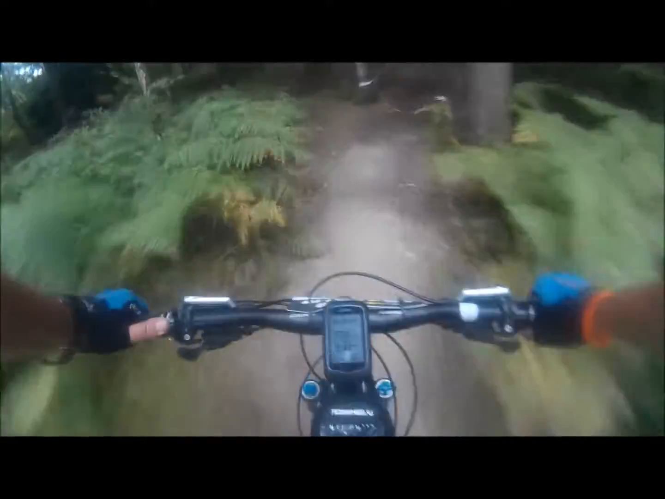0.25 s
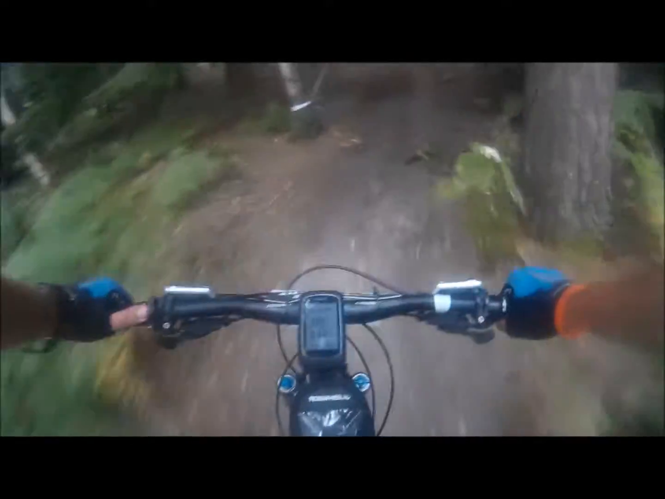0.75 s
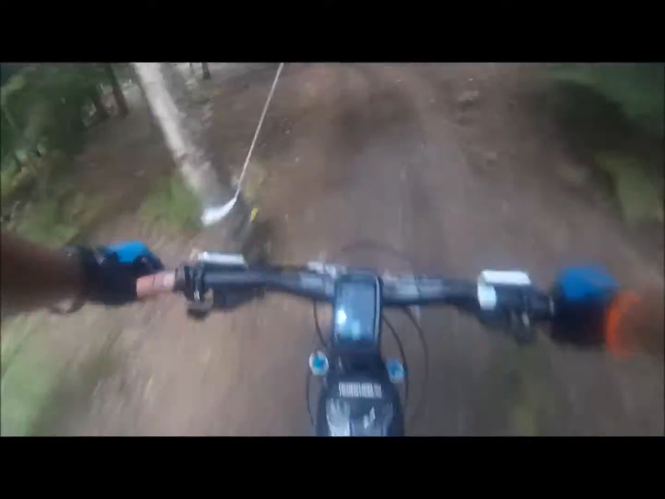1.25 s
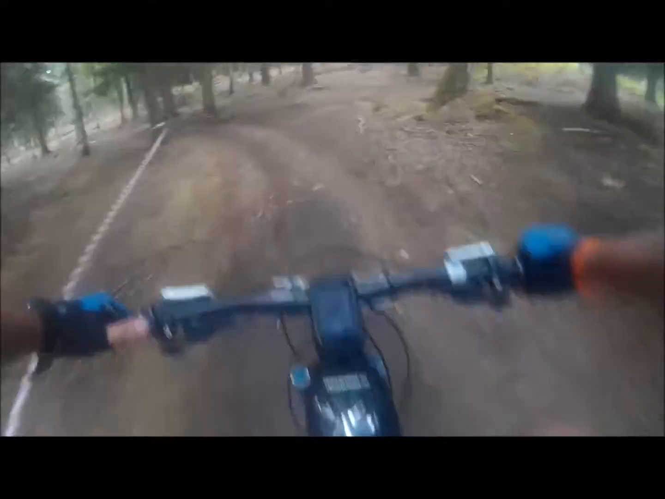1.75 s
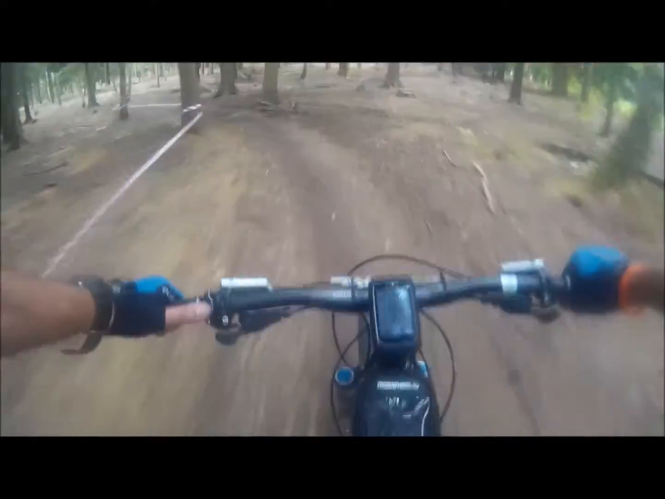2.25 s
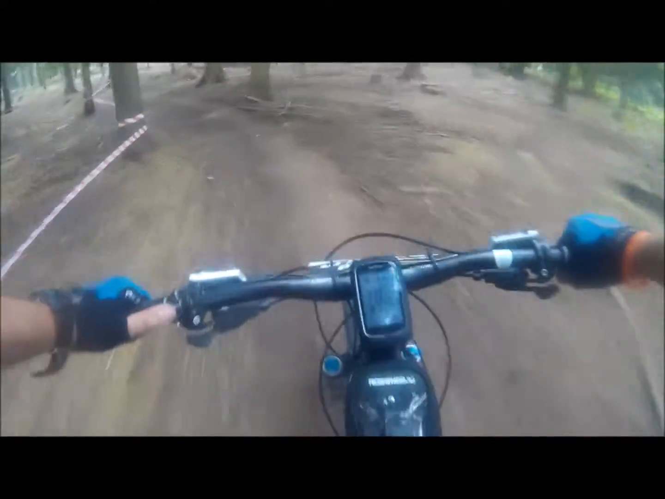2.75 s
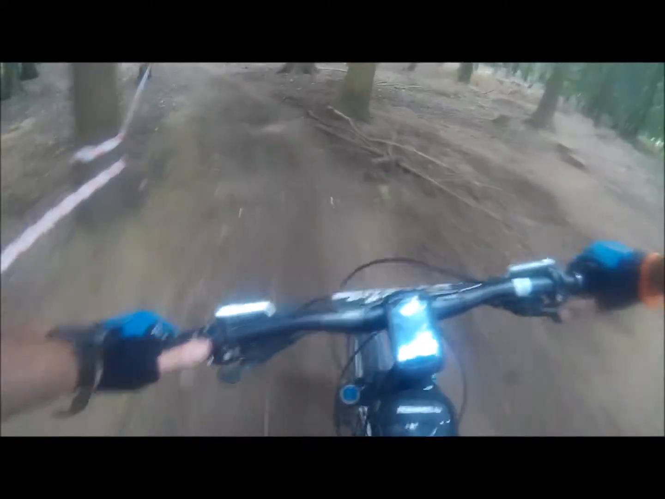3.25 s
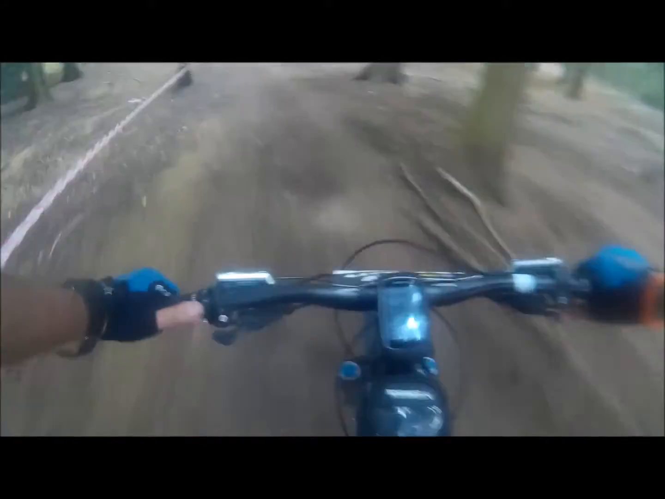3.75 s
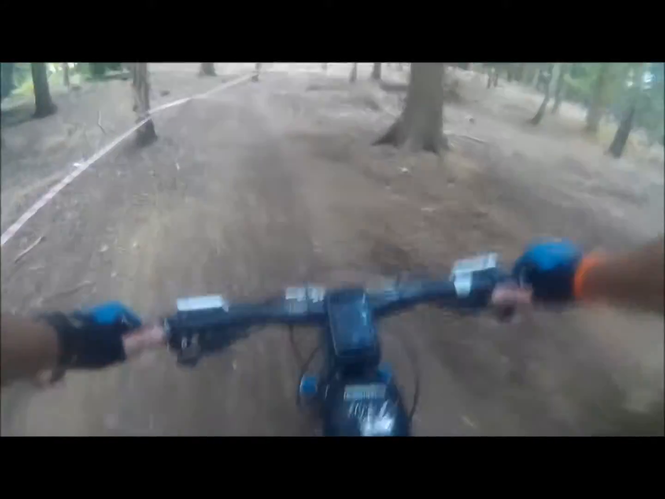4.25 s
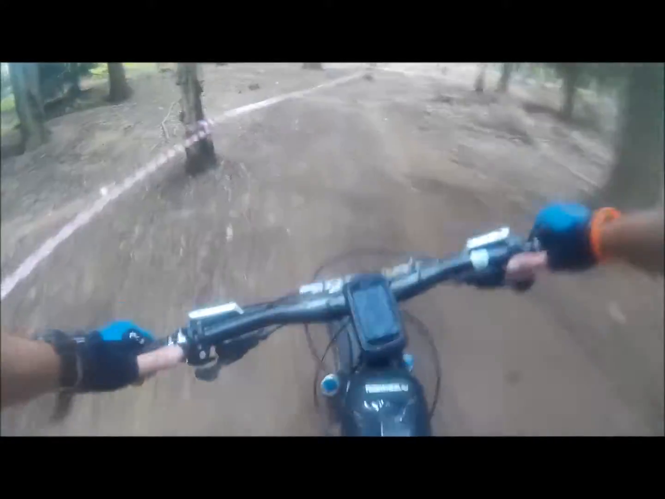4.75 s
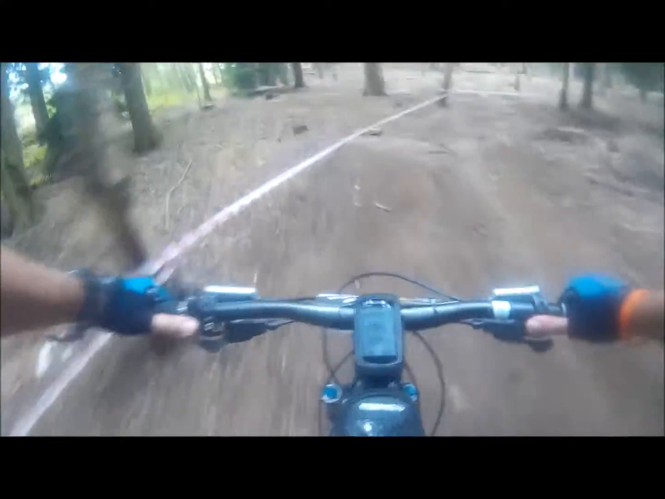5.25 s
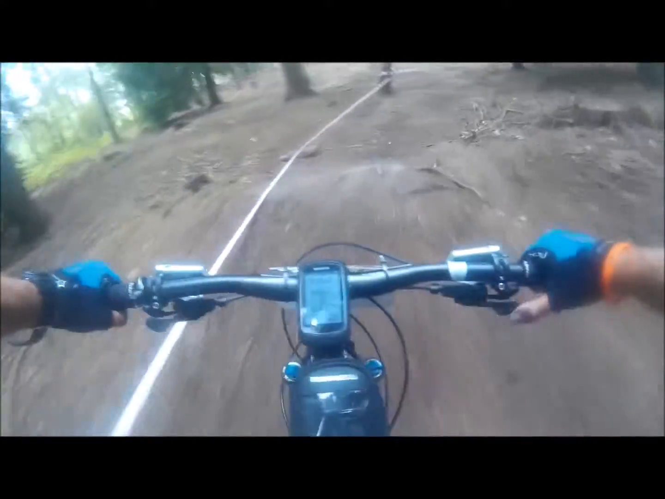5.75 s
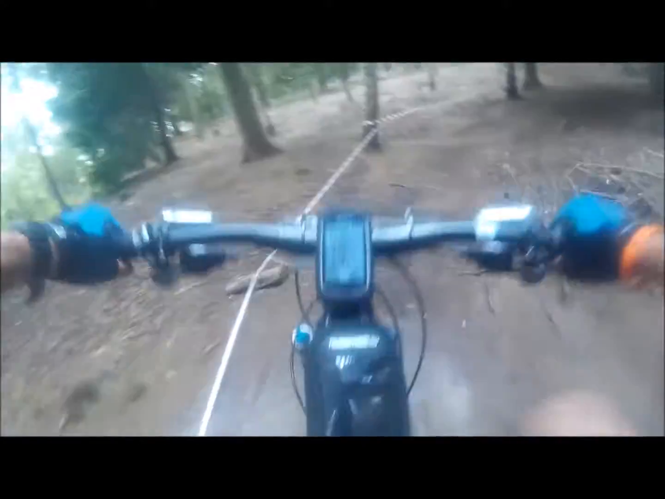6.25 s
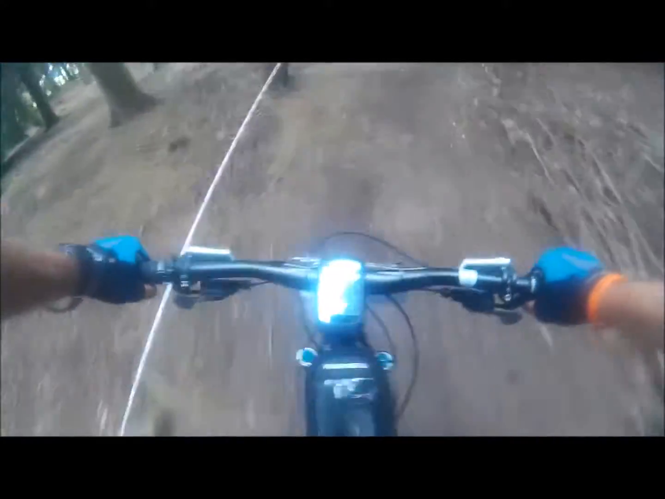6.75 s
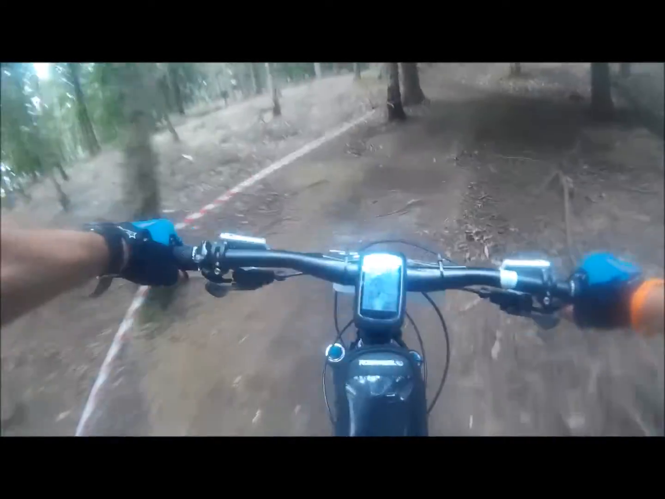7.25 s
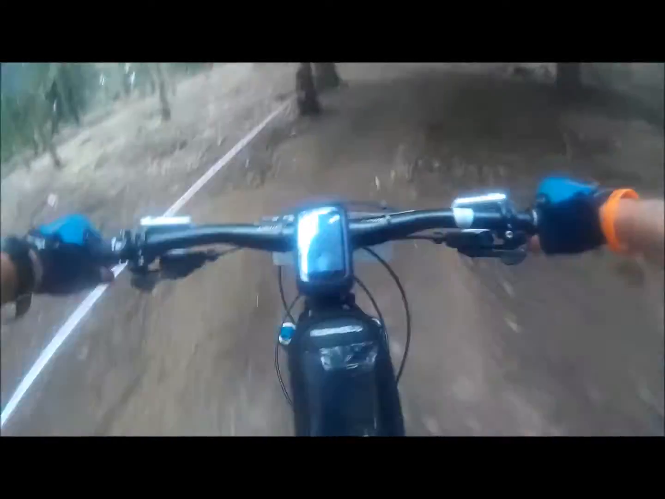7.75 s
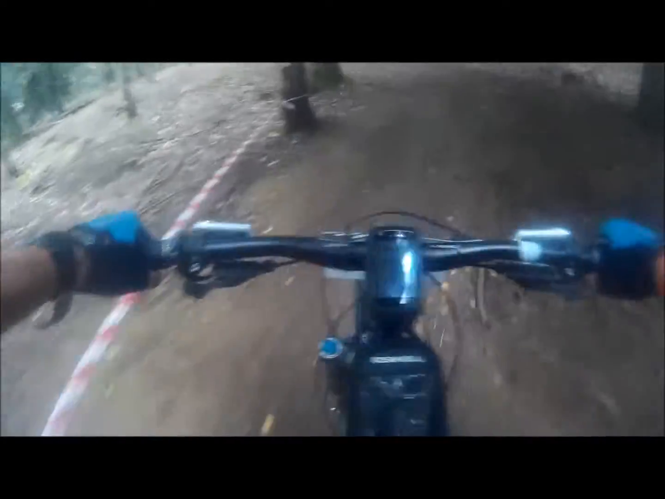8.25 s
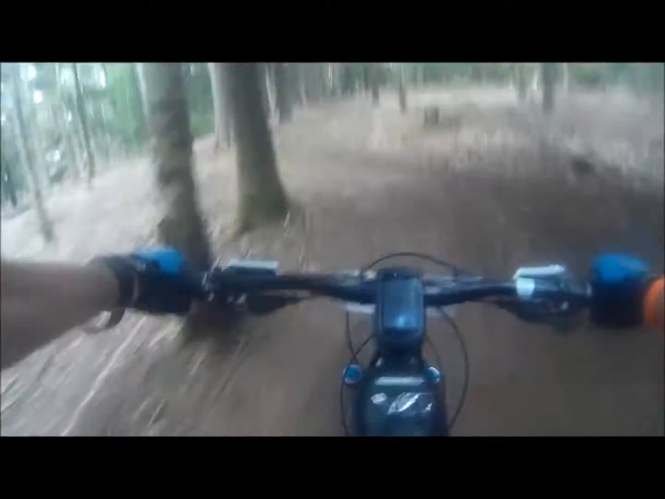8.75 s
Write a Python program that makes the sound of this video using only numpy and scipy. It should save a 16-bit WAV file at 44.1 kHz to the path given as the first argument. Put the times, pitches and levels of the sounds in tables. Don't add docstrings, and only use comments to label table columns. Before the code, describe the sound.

A mountain bike runs down a rooty dirt trail, heard from inside a rattling plastic case with gusty wind, deep rumble, knocks and grit ticks.

```python
import sys
import numpy as np
from scipy import signal
from scipy.fft import rfft, irfft
from scipy.io import wavfile
from scipy.ndimage import uniform_filter1d, minimum_filter1d

SR = 44100
rng = np.random.default_rng(int(sys.argv[2]) if len(sys.argv) > 2 else 0)


def digitize_waveform(pressure):
    field = np.atleast_2d(pressure).T
    bounded = np.clip(field, -1, 1)
    quanta = np.round(bounded * 32767).astype(np.int16)
    wavfile.write(sys.argv[1], SR, quanta)


def volts_from_decibels(level):
    exponent = np.asarray(level, float) / 20
    return 10 ** exponent


N = 396900

# pitch in Hz, width in Hz, level in dB.
CASE_MODES = [(1187, 74, -2), (1500, 91, 5), (1792, 496, 0.5), (2043, 363, -1)]
# pitch in Hz, width in Hz, level in dB.
SHELL_GROUPS = [
    [(2432, 130, 2.5), (2923, 100, 6.5)],
    [(3630, 800, -10), (3887, 310, 0.5), (4150, 710, -10)],
    [(4790, 120, -13), (6050, 280, -10), (6930, 145, -6.5), (7800, 1800, -11.5)],
    [(9950, 170, -6.5), (10460, 480, -9), (11700, 880, -13), (12300, 550, -13), (13600, 1100, -23)],
]
# pitch in Hz, width in Hz, level in dB.
STRAP_MODES = [(149, 91, -10), (285, 49, -19), (412.5, 26.5, 3.5)]


def rms_one(x):
    return x / np.sqrt(np.mean(x ** 2) + 1e-20)


def drift(rate):
    r = np.exp(-80 * np.pi * rate / SR)
    slow = signal.lfilter([1], [1, -2 * r, r * r], rng.standard_normal(N // 40 + 2002))[2000:]
    return np.interp(np.arange(N) / 40, np.arange(len(slow)), rms_one(slow))


def played(rows):
    s, *columns = np.transpose(rows)
    return [np.interp(np.arange(N) / SR, s, column) for column in columns]


def arches(s, length_s, height):
    t = np.arange(0, N, 64)[:, None] / SR
    swells = np.sum(height * np.exp(-(2 * (t - s) / length_s) ** 2), axis=1)
    return np.interp(np.arange(N) / SR, t[:, 0], swells)


def resonance(x, hz, width_hz):
    r = np.exp(-np.pi * width_hz / SR)
    feedback = [1, -2 * r * np.cos(2 * np.pi * hz / SR), r * r]
    return signal.lfilter((1 - r * r) / 2 * np.array([1, 0, -1]), feedback, x + 1e-18)


def body(x, modes):
    out = 0
    for k, (hz, width_hz, db) in enumerate(modes):
        out = out + (-1) ** k * volts_from_decibels(db) * resonance(x, hz, width_hz)
    return out


def coloured(spectrum, count, patchy_db, rate):
    hz, db = np.transpose(spectrum)
    bins = np.arange(N // 2 + 1) * SR / N + 1e-3
    colour = volts_from_decibels(np.interp(np.log(bins), np.log(hz), db, left=-120, right=-120))
    spectrum_now = rfft(rng.standard_normal(N)) * colour
    centres = np.linspace(np.log(hz[0]), np.log(hz[-1]), count)
    together, out = drift(rate), 0
    for k in range(count):
        share = np.interp(np.log(bins), centres, np.arange(count) == k)
        band = irfft(spectrum_now * share, N)
        out = out + band * volts_from_decibels(patchy_db * (0.51 * together + drift(rate)))
    return rms_one(out)


def evened(x, over_s=0.092):
    return rms_one(x / np.sqrt(uniform_filter1d(x ** 2, int(over_s * SR)) + 0.039))


def bursts(times, db, fall_s, strike):
    out, t = np.zeros(N), np.arange(int(0.05 * SR)) / SR
    sprays = rng.standard_normal((len(times), len(t))) * np.exp(-t / np.reshape(fall_s, (-1, 1)))
    sprays /= np.sqrt(np.sum(sprays ** 2, axis=1, keepdims=True))
    sprays[:, 0] += strike
    for s, gain, spray in zip(times, volts_from_decibels(db), sprays):
        at = round(s * SR)
        out[at:at + len(t)] += gain * spray[:N - at]
    return out


def lurching():
    # centre in seconds, level in dB, length in seconds.
    lurches = [(-0.009, -5.5, 0.048), (0.728, -14.5, 0.065), (1.095, -14.5, 0.094), (1.259, -12.5, 0.14),
               (1.467, -16, 0.11), (1.606, -6, 0.08), (1.746, -10.5, 0.33), (2.39, -16, 0.18),
               (2.54, -20, 0.28), (3.255, -12, 0.19), (3.599, -11, 0.072), (3.91, -19.5, 0.55),
               (4.11, -19, 0.19), (4.312, -12.5, 0.14), (4.502, -20, 0.42), (4.661, -7.5, 0.04),
               (4.93, -16, 0.24), (5.096, -12.5, 0.099), (5.238, -15.5, 0.045), (5.508, -18, 0.13),
               (6.243, -15, 0.14), (6.565, -16, .22), (6.92, -12.5, 0.18), (7.125, -10, 0.23),
               (7.233, -2.5, 0.043), (7.384, -12, 0.12), (7.793, -18.5, 0.3), (8.192, -18.5, 0.091),
               (8.412, -13, 0.18), (8.81, -17.5, 0.26)]
    s, db, length_s = np.transpose(lurches)
    return np.sqrt(arches(s, length_s / np.sqrt(2), volts_from_decibels(2 * db)))


def jostle(lurch, rough):
    # pitch in Hz, level in dB per Hz.
    rumble_colour = [(5, -2), (10, 11), (20, -2), (30, -13), (45, -35), (70, -25)]
    swing = np.hypot(lurch, volts_from_decibels(-26.5 + 0.53 * rough))
    return swing * evened(coloured(rumble_colour, count=2, patchy_db=-1.0, rate=17.0))


def rattle(level_db, shell_level_db, per_s, spread_db, shell_db):
    sizes = volts_from_decibels(spread_db * np.minimum(rng.exponential(1, N), 4)) * rng.choice([-1, 1], N)
    born = rng.random(N) < per_s * volts_from_decibels(5.0 * drift(18)) / SR
    shake = rms_one(sizes * born) + 1.57 * rng.standard_normal(N)
    shake *= volts_from_decibels(1.7 * drift(35))
    high = sum(volts_from_decibels(db) * body(shake, group) for db, group in zip(shell_db, SHELL_GROUPS))
    low = volts_from_decibels(level_db) * rms_one(body(shake, CASE_MODES))
    return low + volts_from_decibels(shell_level_db + 0.66 * drift(4.9)) * rms_one(high)


def knocks():
    # start in seconds, peak in dB.
    knock_table = [(0.2512, -25.5), (0.345, -31), (0.671, -27), (1.239, -17.5), (1.277, -17.5),
                   (1.302, -24), (1.7845, -12.5), (1.889, -26), (1.996, -30), (3.222, -23.5),
                   (3.905, -14.5), (4.024, -16.5), (4.272, -43), (4.459, -18), (4.6168, -40), (4.663, -25),
                   (4.763, -18), (5.239, -30.5), (5.348, -28), (5.8048, -27), (6.085, -26), (6.346, -26),
                   (7.148, -23.5), (7.217, -27), (7.866, -26), (8.04, -32), (8.634, -29), (8.116, -26),
                   (8.527, -22), (8.7297, -24)]
    # start in seconds, peak in dB, fall time in seconds.
    scuff_table = [(0.752, -37, 0.02), (0.789, -27.5, 0.03), (1.401, -35, .005), (1.506, -37, 0.0089),
                   (1.542, -26, 0.022), (4.183, -24, 0.0037), (4.245, -17, 0.0032), (4.336, -23, 0.0055),
                   (4.8303, -31, 0.0038), (5.199, -45, 0.004), (6.371, -23.5, 0.0055), (6.411, -34, 0.005),
                   (6.449, -31, 0.0062), (7.541, -30, 0.016), (7.946, -25, 0.0083), (1.856, -26, 0.012),
                   (4.229, -23, 0.004), (4.2903, -16, 0.004), (4.3057, -15.5, 0.011), (4.475, -19, 0.016),
                   (4.861, -18.5, 0.0091), (6.196, -21.5, 0.01), (7.092, -17, 0.0047),
                   (7.6536, -30, 0.0051), (8.264, -26, 0.014), (8.2865, -24, 0.0064), (8.314, -35, .007),
                   (8.4743, -23.5, 0.0089), (8.785, -16, 0.0096), (1.335, -26, .008), (1.769, -24, .006),
                   (4.623, -19, 0.0031), (4.6113, -31, 0.0034), (4.791, -24, .006), (4.9337, -27, 0.0054),
                   (6.178, -27, 0.0066), (6.308, -30, .008), (6.358, -28, .005), (6.431, -31, .007),
                   (6.464, -32, 0.0042), (6.534, -43, 0.0074), (7.79, -29, .006), (8.679, -32, 0.0054),
                   (8.715, -28, 0.0057), (7.71, -33, .008), (7.996, -35, .006)]
    s, db = np.transpose(knock_table)
    blows = bursts(s, db + 30.0, fall_s=0.0047, strike=0.32)
    s, db, fall_s = np.transpose(scuff_table)
    scuffs = bursts(s, db + 29.5 + 8.4 * np.log10(fall_s / 0.016), fall_s, strike=0.17)
    low = body(volts_from_decibels(-2.5) * blows + volts_from_decibels(-3.5) * scuffs, CASE_MODES)
    main = resonance(volts_from_decibels(-4.5) * blows + volts_from_decibels(7.5) * scuffs, 1540, 93)
    shell = body(blows + volts_from_decibels(-2.0) * scuffs, SHELL_GROUPS[0] + SHELL_GROUPS[1])
    return low - main + volts_from_decibels(-22.0) * shell


def ticks():
    # start in seconds, peak in dB, hardness in dB, fineness in dB.
    grains = [(0.3463, -31, -1, 1), (0.671, -26, -1.5, 2), (1.0077, -42, -9, -2), (1.2407, -40, 0, -17),
              (1.277, -20.5, -5.5, 9), (1.4726, -40, -25, -8), (1.7859, -16.5, -3.5, 5),
              (2.107, -27, -3.5, 8), (3.618, -27.5, 1.5, 23), (3.741, -19.5, -6.5, 15.5),
              (3.8528, -30, -18, -4), (4.0237, -21, 0.5, 3), (4.4577, -23.5, 0.5, -2),
              (4.658, -33.5, -12, -2), (4.87, -25, 0.5, -2), (5.612, -21, 0, 4), (6.0558, -30.5, -1, 1),
              (6.199, -27.5, -0.5, -0.5), (6.756, -34, 2.5, -7), (7.141, -33, -17, 2),
              (7.543, -26.5, -3, 4.5), (8.1175, -32, -3.5, -1), (8.787, -37, -36, -13),
              (1.401, -37, -12, -5), (4.176, -44, -12, -15), (4.3794, -42, -17, -8), (4.7476, -36, -12, 4),
              (5.795, -40, -3, 2), (7.09, -31, -14, -2), (7.211, -39, -6, 0), (8.408, -47, 2, 2),
              (7.9668, -40, -15, 2.5), (8.8278, -41, -12, -13), (8.9106, -39, -10, -6)]
    # pitch in Hz, width in Hz.
    deaf_gaps = [(5300, 250), (8700, 690)]
    s, db, hard_db, fine_db = np.transpose(grains)
    shares = (-9.5 - 0.78 * fine_db, 0, hard_db, -6 + hard_db + fine_db)
    lifts_db, falls_s = (30.3, 30.66, 30.86, 27.7), (0.0086, 0.0048, 0.0041, 0.0022)
    out = 0
    for share, group, lift_db, fall_s in zip(shares, SHELL_GROUPS, lifts_db, falls_s):
        hits = bursts(s, db + share + lift_db, fall_s * volts_from_decibels(-0.21 * fine_db), strike=0.83)
        out = out + body(hits, group)
    for hz, width_hz in deaf_gaps:
        out = out - resonance(out, hz, width_hz)
    return out


def rings():
    # start in seconds, pitch in Hz, peak in dB, rise time
    # in seconds.
    clear_rings = [(0.672, 2940, -34.5, 0.002), (.752, 1526, -32, .003), (1.099, 114, -26, 0.0066),
                   (1.105, 280, -39.5, 0.011), (1.2399, 1540, -23, .0015), (1.2397, 2500, -31, 0.0011),
                   (1.266, 230, -30, .008), (1.33, 420, -37, .01), (1.353, 96, -23, 0.0056),
                   (1.4, 1160, -37, 0.0037), (1.4735, 2990, -38, 0.0018), (1.575, 425, -37.5, 0.0087),
                   (1.76, 248, -37, 0.011), (3.618, 4000, -18.5, 0.00064), (3.741, 3870, -20.5, 0.001),
                   (3.741, 6820, -28, 0.00076), (4.024, 7095, -34, .001), (4.229, 1480, -25.5, 0.0013),
                   (4.309, 1537, -20, 0.0017), (4.491, 247, -38.5, 0.02), (4.516, 397, -35, 0.0065),
                   (4.613, 1490, -29, .0015), (4.655, 241, -31, 0.0089), (4.674, 53.6, -13.5, 0.0098),
                   (5.02, 258, -32.5, 0.0089), (5.121, 255, -33.5, 0.01), (5.612, 6050, -18.5, 0.00052),
                   (5.612, 2970, -33, 0.0021), (5.613, 1530, -34.5, 0.0025), (6.199, 1550, -31, 0.0017),
                   (6.199, 2870, -32, .001), (6.346, 1530, -21.5, 0.00056), (6.411, 1560, -33, .002),
                   (7.655, 1495, -32.5, 0.0046), (8.4741, 1524, -31, 0.004), (6.461, 1477, -32, .003),
                   (6.436, 1750, -35, .002), (3.618, 10000, -23, 0.00065), (3.618, 11640, -26, 0.00054),
                   (3.619, 6050, -30, 0.00078), (3.741, 10200, -21, .0006), (3.742, 11300, -25, .0005),
                   (8.729, 1520, -35, 0.0037), (4.027, 10600, -32, .001), (8.118, 3850, -34, 0.001),
                   (8.12, 2950, -37, 0.0013), (4.2908, 1530, -26, 0.0023), (4.4742, 1500, -27, 0.0024),
                   (2.86, 55, -31, 0.022), (3.728, 69, -27.5, 0.0083), (4.079, 42, -16, 0.014),
             (4.83, 45.4, -27, 0.027), (5.742, 39.7, -26, 0.036), (6.978, 333, -46, 0.023),
             (7.083, 350, -34, .008), (7.21, 990, -42, .006), (7.232, 322, -36, 0.0075),
             (7.39, 404, -39, 0.0071), (7.431, 108.4, -36, 0.021), (3.618, 10760, -27, .0005)]
    out, t = np.zeros(N), np.arange(int(0.15 * SR)) / SR
    for s, hz, db, rise_s in clear_rings:
        swell = t / rise_s * np.exp(1 - t / rise_s)
        out[round(s * SR):][:len(t)] += volts_from_decibels(db) * swell * np.sin(2 * np.pi * hz * t)
    return out


def rubs():
    # centre in seconds, length in seconds, high band in dB, low band in dB.
    rub_table = [(0.054, 0.11, -54.5, -44.5), (0.732, 0.054, -63, -53), (.775, 0.071, -71, -41),
                 (1.347, 0.047, -49, -40), (1.51, 0.071, -50.5, -40.5), (1.58, .08, -51, -35.5),
                 (1.773, 0.044, -44, -35), (1.88, .06, -59, -45), (2.5, 0.13, -67, -48),
                 (4.27, 0.12, -67, -45), (4.34, 0.046, -53, -50), (4.517, 0.13, -48.5, -38.5),
                 (4.663, 0.031, -45, -47), (4.709, 0.037, -44, -42), (4.808, 0.027, -57, -46),
                 (5.054, .12, -56, -51), (5.5, 0.12, -57, -50), (5.739, 0.033, -58, -45),
                 (5.88, 0.073, -52.5, -46), (6.147, 0.17, -63, -45.5), (6.41, 0.018, -63, -46),
                 (6.443, 0.048, -70, -46), (6.616, 0.077, -56, -43.5), (7.08, 0.11, -50, -44),
                 (7.3, 0.043, -56, -41), (7.84, 0.046, -59, -44), (7.934, 0.066, -50.5, -43),
                 (8.226, 0.11, -57, -46.5), (8.338, 0.064, -54.5, -50), (8.808, 0.21, -55, -45)]
    # pitch in Hz, width in Hz, level in dB.
    high_bloom = [(3400, 290, 0), (3860, 620, 0)]
    low_bloom = [(1817, 215, 15), (2085, 160, 0.5)]
    s, length_s, high_db, low_db = np.transpose(rub_table)
    grit = rng.standard_normal(N) * volts_from_decibels(3.9 * drift(78))
    high = arches(s, length_s, volts_from_decibels(high_db)) * rms_one(body(grit, high_bloom))
    low = arches(s, length_s, volts_from_decibels(low_db)) * rms_one(body(grit, low_bloom))
    return high + low


def hum(rough):
    # pitch in Hz, width in Hz, level in dB.
    overtones = [(2927, 42, -13.5), (3865, 170, -15)]
    # centre in seconds, length in seconds, lift in dB.
    singing = [(.85, 0.13, 10), (1.944, 0.24, 12.5), (2.3, 0.16, 10), (2.624, 0.29, 6), (3.397, 0.53, 5.5),
               (4.75, 0.83, 4), (7.8, 0.34, 0), (8.25, .3, 0)]
    fine = rng.standard_normal(N)
    sung = resonance(fine, 1515, 59) + body(fine, overtones)
    level_db = -56 + 0.77 * rough + arches(*np.transpose(singing)) + 3 * drift(4.6)
    return volts_from_decibels(level_db) * rms_one(sung)


def squeak(at_s=5.65, length_s=0.024, hz=1050, db=-38):
    t = np.arange(N) / SR - at_s
    shape = np.sin(np.pi * np.clip(t / length_s, 0, 1))
    upper = rms_one(resonance(rng.standard_normal(N), 1850, 300))
    return volts_from_decibels(db) * shape * (np.sin(2 * np.pi * hz * t) + 0.4 * upper)


def thuds():
    # start in seconds, peak in dB.
    root_jolts = [(1.096, -46), (1.156, -31), (1.271, -22), (1.36, -37), (1.759, -31), (1.931, -28),
                  (2.393, -33), (4.45, -53), (4.646, -46), (4.68, -34), (5.028, -37), (5.127, -34),
                  (7.086, -33), (7.221, -32), (7.39, -42)]
    s, db = np.transpose(root_jolts)
    soften = signal.butter(2, 600, fs=SR, output="sos")
    jolts = signal.sosfilt(soften, bursts(s, db + 44.0, 0.0079, strike=0.15))
    return body(jolts, STRAP_MODES)


def pulse(beat_hz, cycles, second_db, second_s):
    # start in seconds, peak in dB.
    beats = [(0.261, -19), (0.617, -19.5), (0.996, -18.5), (1.345, -24), (1.71, -23), (2.068, -17.5),
             (2.434, -12), (2.795, -21), (3.162, -18.5), (3.522, -10.5), (3.881, -8.5), (4.233, -23),
             (4.606, -12), (4.965, -13), (5.316, -19.5), (5.684, -21), (6.041, -19), (6.397, -24),
             (6.742, -24), (7.084, -8.5), (7.218, -19), (7.469, -19.5), (7.825, -16), (8.189, -16),
             (8.537, -15.5), (8.891, -16)]
    out, t = np.zeros(N + SR), np.arange(int(0.12 * SR)) / SR
    chance = rng.standard_normal((len(beats), 3))
    for (s, db), (a, b, c) in zip(beats, chance):
        first = (0, volts_from_decibels(db - 4.0), 1 + 0.074 * a)
        second = (second_s + 0.015 * b, volts_from_decibels(db + second_db + 2.2 * c), 1.15)
        for lag, gain, pitch in (first, second):
            turns = t * pitch * beat_hz
            shape = np.sin(np.pi * np.minimum(turns / cycles, 1)) ** 2
            at = round((s + lag) * SR)
            out[at:at + len(t)] -= gain * shape * np.sin(2 * np.pi * turns)
    return out[:N]


def wind(wind_db):
    # pitch in Hz, level in dB per Hz.
    wind_colour = [(16, -53), (28, -10.5), (41, -7.5), (70, -15.5), (145, -21), (405, -27.5), (495, -32),
                   (874, -36), (1100, -36.5), (1430, -58), (2420, -120)]
    buffets = coloured(wind_colour, count=8, patchy_db=1.1, rate=14)
    return volts_from_decibels(wind_db) * (buffets + volts_from_decibels(-13.5) * body(buffets, STRAP_MODES))


def hiss(hiss_db):
    # pitch in Hz, level in dB per Hz.
    hiss_colour = [(2200, 3), (3300, 5), (4600, 0.5), (6600, 0), (9200, -0.5), (11000, -1), (14300, -3),
                   (15700, -2), (17000, -28)]
    return volts_from_decibels(hiss_db) * coloured(hiss_colour, count=3, patchy_db=0.6, rate=8)


def whine():
    chop_hz, whine_hz, leak_hz, start_s = 33.05, 8659.1, 8440, 0.0274
    t = np.arange(N) / SR - start_s
    strong = t * chop_hz % 1 < 0.5
    clicks = np.diff(strong * 1.0, prepend=0)
    switching = resonance(resonance(clicks, leak_hz, 300), leak_hz, 300)
    tone = np.where(strong, 1, -0.39) * np.sin(2 * np.pi * whine_hz * t + 1.2)
    return volts_from_decibels(-52.5) * (tone + 10.0 * switching)


def buzz():
    # start in seconds, length in seconds, pitch in Hz, level in dB.
    buzz_table = [(0.033, 0.095, 140.1, -37), (2.023, 0.089, 137.5, -34.5), (4.046, 0.086, 135.6, -32.5),
                  (6.029, 0.12, 138.5, -38), (8.026, 0.11, 137.8, -34)]
    # multiple of the pitch, level in dB.
    buzz_orders = [(1, -4.5), (2, -4), (3, -13.5), (4, -17.5), (5, -19.5), (6, -24)]
    out = np.zeros(N)
    for s, length_s, hz, db in buzz_table:
        t = np.arange(int(length_s * SR)) / SR
        stack = sum(volts_from_decibels(db + order_db) * np.sin(2 * np.pi * k * hz * t) for k, order_db in buzz_orders)
        out[round(s * SR):][:len(t)] += signal.windows.tukey(len(t), 0.4) * stack
    return out


def scene():
    # time in seconds, level in dB.
    trail = [(0, -48.5), (.5, -51), (1.15, -45.5), (1.4, -41), (1.85, -45.5), (2.6, -47.5), (2.85, -53),
             (3.1, -52), (3.35, -47.5), (4.45, -42.5), (5.1, -45), (5.3, -49.5), (6.0, -48), (6.6, -47),
             (6.82, -50.5), (7.15, -43), (7.6, -53), (8.0, -47)]
    # time in seconds, level in dB.
    stream = [(0.0, -60), (0.63, -64.5), (1.88, -59), (2.2, -63.5), (2.48, -58.5), (2.98, -64.5),
              (4.18, -61), (5.09, -59.5), (5.64, -65), (6.17, -62.5), (6.97, -63), (7.17, -62),
              (7.37, -63.5), (7.55, -59), (7.77, -62.5), (8.0, -60), (8.15, -63.5), (9.0, -59.5)]
    # centre in seconds, length in seconds, change in dB.
    gust_table = [(0.31, 0.22, -4), (1.133, 0.06, 3.5), (1.294, 0.11, 2), (1.572, 0.12, -2),
                  (2.99, 0.11, -3), (3.347, 0.17, 2), (4.083, 0.1, 2.5), (4.536, 0.16, 2.5),
                  (5.133, 0.076, 3), (5.22, 0.056, -2), (5.57, 0.089, 6.5), (5.973, 0.062, -1.5),
                  (6.295, 0.061, 3), (6.545, 0.088, 1), (6.666, 0.14, 4), (2.298, .1, 0), (8.053, 0.057, 3),
                  (6.798, 0.12, -6), (7.457, 0.067, 2), (7.642, 0.23, -7), (8.807, 0.19, 1.5)]
    # centre and length in seconds, change in dB.
    lulls = [(0.282, 0.082, -2), (0.64, 0.043, -3), (1.293, .015, -9), (2.5, 0.046, 0), (3.69, .06, -4),
             (4.155, 0.036, -13), (4.213, 0.025, -9), (4.258, 0.021, -5), (4.596, .025, -4),
             (4.64, .02, -1), (4.74, 0.023, 0), (4.852, 0.022, -11), (5.96, 0.079, -9), (6.338, .012, 1),
             (6.396, .012, -3), (6.48, .015, -5), (8.443, 0.033, -3)]
    (trail_db,), (stream_db,) = played(trail), played(stream)
    rough, fast = trail_db - trail_db.mean(), stream_db - stream_db.mean()
    gust_db = arches(*np.transpose(gust_table))
    lull_db = arches(*np.transpose(lulls))
    lurch = lurching()
    stirred_db = 8.5 * lurch / lurch.max()
    stirred_db = stirred_db + 0.9 * drift(13)

    low = thuds() + jostle(lurch, rough) + pulse(64.7, 2.6, -21.5, 0.11)
    case_db = trail_db + lull_db + 0.36 * fast + stirred_db + 0.23
    shell_level_db = -59.5 + 0.97 * rough + 0.58 * fast + stirred_db
    shaken = rattle(case_db, shell_level_db, per_s=540, spread_db=2.0, shell_db=(2.0, 5.5, -5.0, -27.0))
    case = shaken + knocks() + ticks() + squeak() + hum(rough) + rubs() + rings()
    wind_db = -38 + 0.26 * rough + 0.7 * fast + stirred_db + gust_db
    hiss_db = stream_db + 6.5 + 1.05 * stirred_db + gust_db
    air = wind(wind_db) + hiss(hiss_db)
    electronics = buzz() + volts_from_decibels(fast + gust_db) * whine()
    return (low + case + air + electronics)[None]


def starve(x, frames, keep_db, boost_db, fade_s, smear_s):
    x, size = np.pad(x, SR), int(smear_s * SR)
    t = (np.arange(size) - size / 2) / SR
    arch = np.sin(np.pi * np.arange(size) / size)
    for s, length_s, hz in frames:
        start = round((1 + s) * SR) - size // 2
        frame = slice(start, start + size)
        lines = rfft(x[frame] * arch) * (np.arange(size // 2 + 1) * SR / size > hz)
        height = np.abs(lines)
        tallest = -minimum_filter1d(-height, size=45)
        stands_out = tallest > volts_from_decibels(keep_db + 6) * uniform_filter1d(height, size=201)
        near_peak = -minimum_filter1d(-1.0 * (height == tallest), size=5) > 0
        strong = stands_out & near_peak
        gate = np.clip((length_s / 2 - np.abs(t)) / fade_s + 0.5, 0, 1)
        silenced = irfft(lines * ~strong, size) / np.maximum(arch, 0.1) * gate
        x[frame] += (volts_from_decibels(boost_db) - 1) * irfft(lines * strong, size) * arch - silenced
    return x[SR:-SR]


def faint_chord(at_s=0.233, length_s=0.042):
    # pitch in Hz, level in dB.
    tones = [(1650, -43), (2930, -46.5), (3850, -43), (4200, -50), (4900, -50), (7000, -52), (8150, -48),
             (10550, -54), (12950, -52)]
    t = np.arange(N) / SR - at_s
    arch = np.sin(np.pi * np.clip(t / length_s, 0, 1)) ** 2
    return arch * sum(volts_from_decibels(db) * np.sin(2 * np.pi * (hz * t + rng.random())) for hz, db in tones)


def band_limit(x):
    return signal.sosfilt(signal.butter(12, 15850, fs=SR, output="sos"), x)


def record(dry):
    # centre in seconds, length in seconds, lowest silenced pitch in Hz.
    dropouts = [(0.005, 0.004, 4823), (0.037, 0.013, 3789), (0.143, 0.015, 2928), (0.446, 0.012, 2900),
                (0.741, 0.015, 2400), (0.916, 0.012, 1722), (1.066, 0.015, 2200), (1.192, 0.011, 2300),
                (1.746, 0.018, 2200), (2.342, 0.015, 2100), (2.665, 0.012, 2300), (3.113, 0.018, 2067),
                (3.178, 0.015, 2400), (3.349, 0.015, 1722), (3.964, 0.017, 2200), (4.542, 0.012, 2067),
                (4.921, 0.015, 2100), (4.968, 0.011, 2300), (5.328, 0.015, 2583), (5.525, 0.015, 1894),
                (5.651, 0.011, 2239), (6.075, 0.015, 2300), (6.783, 0.017, 3962), (6.975, 0.015, 3789),
                (7.994, 0.012, 2300), (8.106, 0.014, 2239), (8.232, 0.010, 4500), (8.8, 0.036, 3789)]
    frames = dropouts + [(0.255, 0.012, 5200)]
    rounded = 1.2 * np.tanh(dry[0] / 1.2)
    x = starve(rounded, frames, keep_db=2.5, boost_db=5, fade_s=0.006, smear_s=0.05)
    top_cut = signal.cheby2(6, 25, 15950, fs=SR, output="sos")
    x = signal.sosfilt(top_cut, x + faint_chord())
    return band_limit(x[None])


dry = scene()
out = record(dry)
digitize_waveform(out)
```